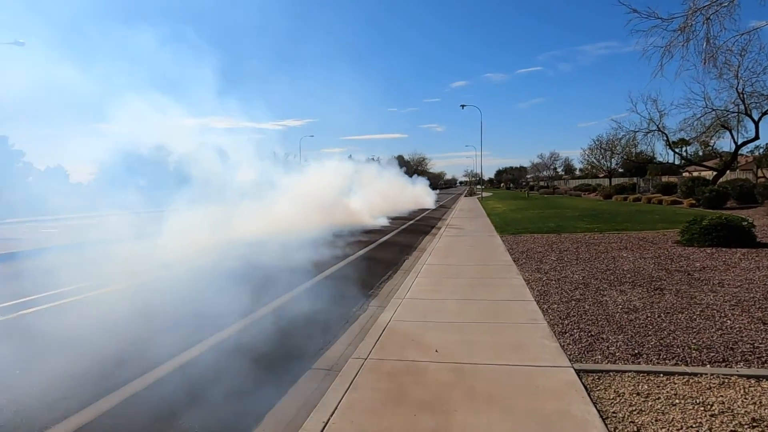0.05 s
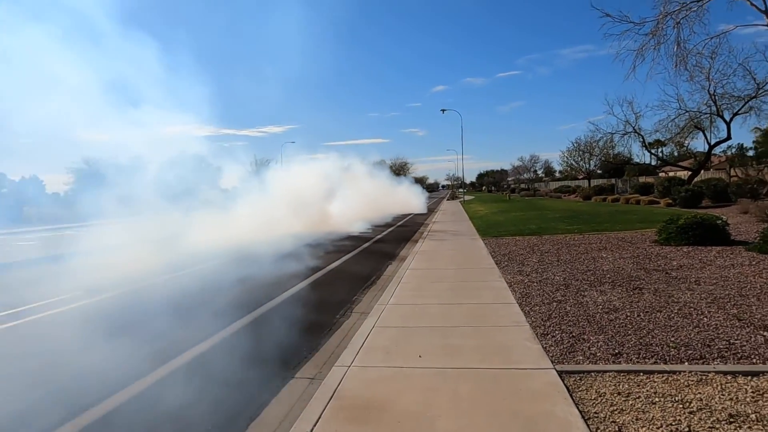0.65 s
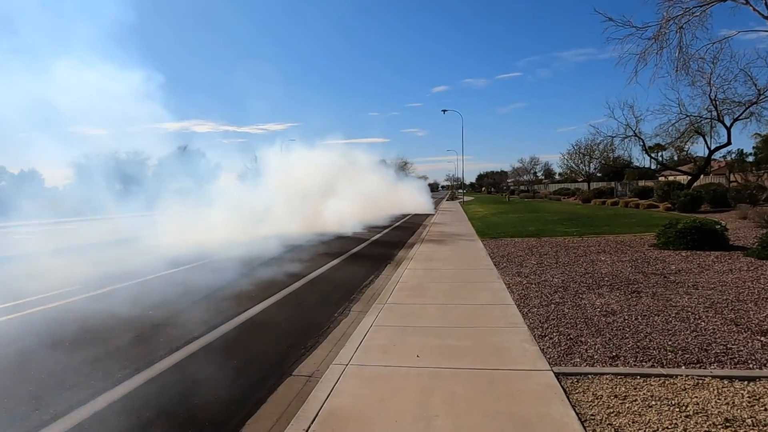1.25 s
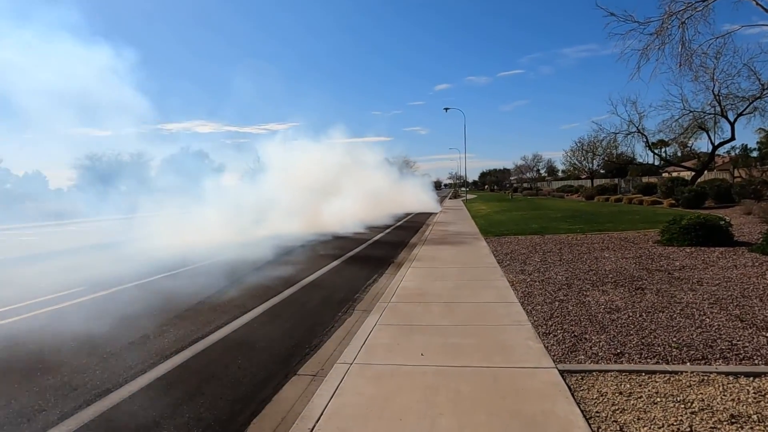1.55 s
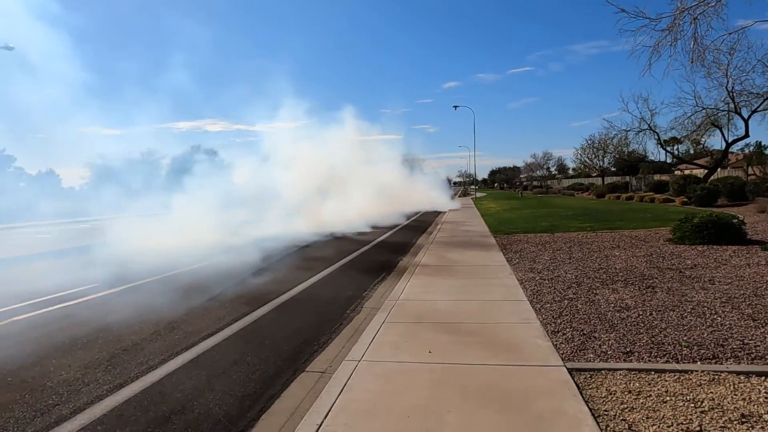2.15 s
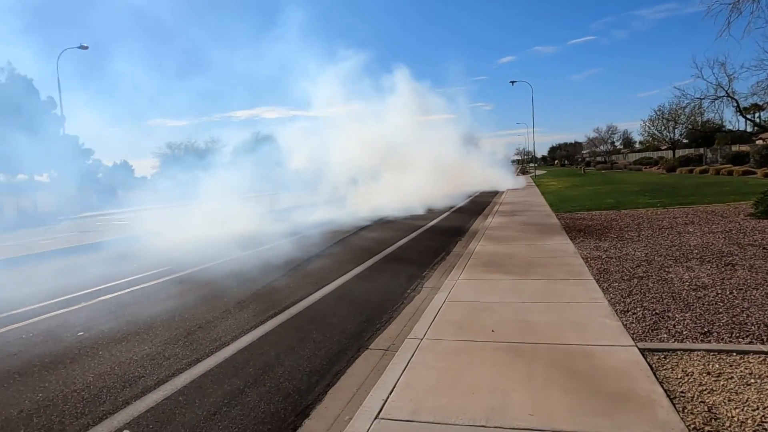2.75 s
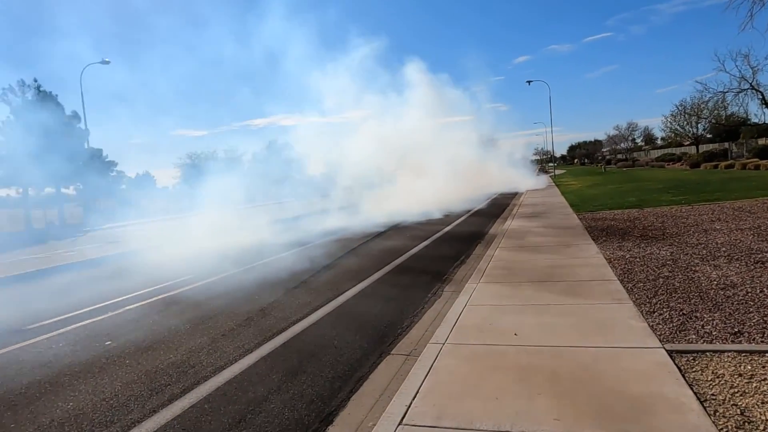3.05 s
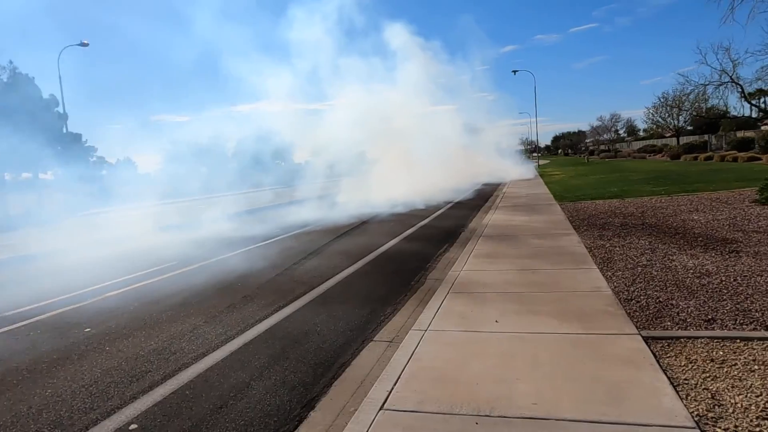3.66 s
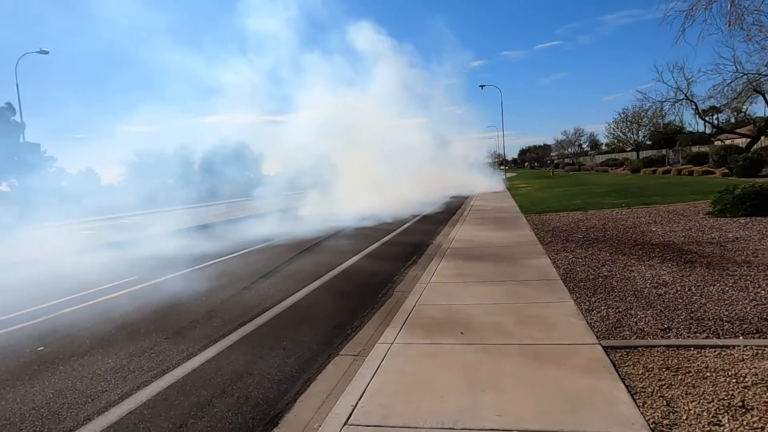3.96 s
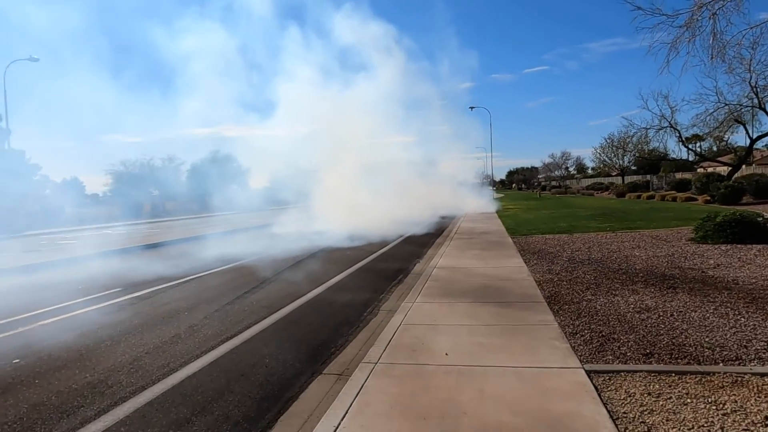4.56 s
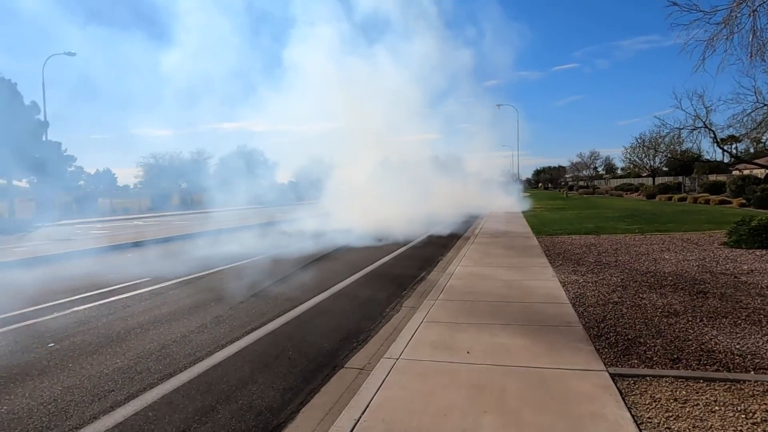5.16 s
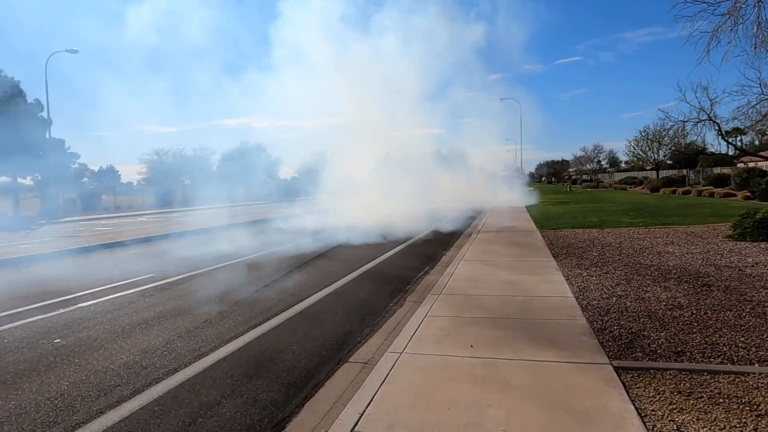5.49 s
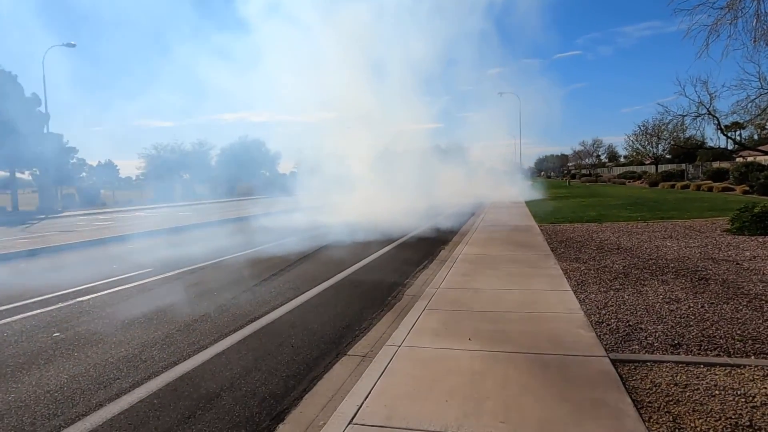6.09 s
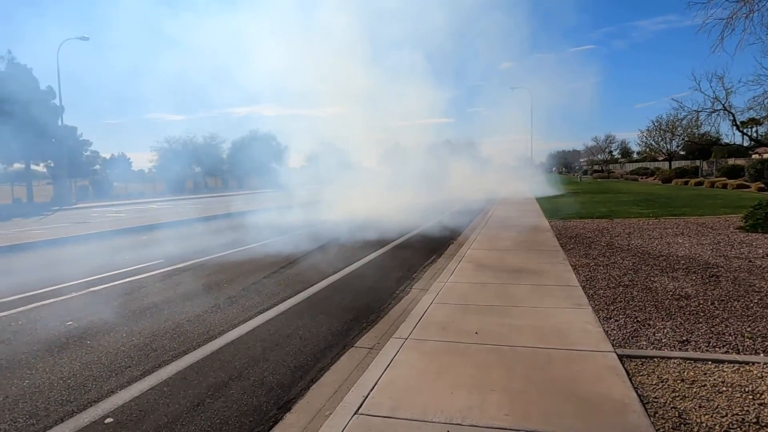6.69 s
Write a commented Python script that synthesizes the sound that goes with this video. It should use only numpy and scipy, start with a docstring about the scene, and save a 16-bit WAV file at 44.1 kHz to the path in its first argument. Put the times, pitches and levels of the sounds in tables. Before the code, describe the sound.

A V8 car revs hard through a burnout, tyres squealing briefly, then backs off with exhaust pops and crackles and drones away.

```python
"""A V8 car does a burnout on an open road, heard through one microphone at the roadside.
Close by, it revs up, eight blows a cycle ringing the tailpipe, and the slipping tyres chirp.
It stumbles and bangs at about 1 s, then pulls hard, the gas rasping out in puffs.
Near 4 s the throttle closes and unburnt fuel pops and crackles in the exhaust, echoing faintly off
walls and trees. Last, farther off, the car drones away at steady speed over a low outdoor rumble."""
import sys
import numpy as np
from scipy import signal
from scipy.fft import rfft, irfft, next_fast_len
from scipy.io import wavfile
from scipy.ndimage import uniform_filter1d, minimum_filter1d, map_coordinates

SR = 44100
rng = np.random.default_rng(int(sys.argv[2]) if len(sys.argv) > 2 else 0)


def persist_wave(psi):
    """Save psi, clipped to +-1, as 16-bit WAV."""
    counts = np.round(np.clip(psi, -1, 1) * 32767).astype(np.int16)
    wavfile.write(sys.argv[1], SR, np.atleast_2d(counts).T)


N = 305613
TIME = np.arange(N) / SR
FIRINGS, MID_SPEED = 8, 260  # firings per cycle; mid revs in firings per second

# Each row: time in seconds, engine speed in firings per second.
SPEED = [(0, 231), (.17, 268), (.75, 369.2), (.86, 387), (.92, 374), (1.05, 321), (1.2, 246), (1.3, 224.5),
         (1.6, 236.2), (1.72, 238), (2.02, 253.4), (2.4, 264.6), (2.5, 271), (2.72, 276.8), (2.85, 284.3),
         (3.34, 301.6), (3.52, 291.7), (3.72, 299), (3.88, 294.5), (4.1, 268), (5, 238), (5.16, 229.8),
         (6, 225.6), (6.92, 219.6)]
def crank(flutter=0.0016):
    """Engine cycles completed; the speed is never quite steady."""
    return np.cumsum(curves(SPEED)[0] * (1 + flutter * wobble(30))) / SR / FIRINGS

# In firing order: each cylinder's strength at the tailpipe, and its delay in firing intervals.
BLOW_STRENGTH = [0.76, 0.95, 0.5, .78, 0.6, 0.98, 0.48, 0.31]
BLOW_DELAY = [0, .17, -.02, .06, -.06, .19, .11, 0]
def order_wave(order, cycles, spread=.2, skew=0.4):
    """One harmonic of the cycle rate, phased by the eight blows; the muffler delays high ones more."""
    arrival = (np.arange(FIRINGS) + BLOW_DELAY) / FIRINGS
    phase = np.angle(np.dot(BLOW_STRENGTH, np.exp(-2j * np.pi * order * arrival)))
    lag = skew + spread * np.pi * (order / FIRINGS) ** 2
    return np.sqrt(2) * np.cos(2 * np.pi * order * cycles + phase - lag)

# The main harmonics, as multiples of the cycle rate.
STRONG_ORDERS = (4, 6, 8, 16)
# Each row: multiple of the cycle rate, then relative dB when revving, lugging, pulling and coasting.
WEAK_ORDERS = [(2, 7, 3.5, 1.5, 4), (3, 2.5, 1, -2.5, 11.5), (5, -2.5, -12.5, -19, 2.5),
               (7, -14, -18, -19.5, 8), (9, -4.5, -6.5, -0.5, 6), (10, 2.5, -1.0, 1.5, 11.5),
               (11, -2.0, -1, -3, 10), (12, 3.5, 3, 4, 10), (13, -1.5, -4, -4, -1.5), (14, 3, 3, 1.5, 11),
               (15, -1.5, -9, -24.5, 1), (17, 6, 2, -4.0, -10.5), (18, 2, 7, 7, 2), (19, 4, 3.5, 2, 0.5),
               (20, 5.5, 7, 6, 2.5), (21, -5.5, 3, 5.5, -7.5), (22, 1.5, -4.5, -4, -3),
               (23, -0.5, 1, 0, -6), (24, 5.5, -2, 5, -3), (25, -3, 0, 0, -5.5), (26, 0.5, 7.5, 5, -11),
               (27, 8.5, 4.0, 8.5, -11), (28, 4, 5, 9.5, -11), (29, 2.5, 2.5, 1, -17.5),
               (30, -6, -0.5, -1, -18), (31, 2, 9, 5.5, -13.5), (32, 7, 6, 7.5, -12),
               (33, 0.5, 6, 2, -11.5), (34, 5.5, 3, 2, -7.5), (35, 12.5, 11.5, 16.5, -8.5),
               (36, 10.5, -9.5, 4.5, -12)]
# Timing scatter at mid revs, in cycles, one value per stage; largest with the throttle shut.
SCATTER = (.003, .0035, .0017, .004, .025, .015, .0015, .0015)
# The tailpipe's tone. Each row, as in every tone below: frequency in Hz, relative level in dB.
PIPE_TONE = [(20, -14), (75, -8.5), (140, -2.5), (230, -1), (330, -2), (450, 2), (570, -0.9), (690, -13.5),
             (800, -9.5), (910, -14), (1100, -24), (1260, -36.5), (1450, -42.5), (2000, -41.5),
             (4000, -63.5)]
def exhaust_note(cycles, waver_db=0.6, lug_fade_s=(2.3, 3.0), size=2048):
    """The repeating part of the exhaust pulses, shaped by the pipe; its harmonics follow the load."""
    orders, *load_db = np.transpose(WEAK_ORDERS)
    waves = np.array([order_wave(round(k), np.arange(size) / size) for k in orders])
    revving = by_stage(np.isin(STAGES, "revving"))
    loaded = by_stage(np.isin(STAGES, ("stumbling", "pulling")))
    climbed = np.interp(TIME, lug_fade_s, (0, 1))  # out of low-speed lugging
    shares = revving, loaded * (1 - climbed), loaded * climbed, 1 - revving - loaded
    # blows come early or late, more so at high revs, blurring the high orders into a roar
    scatter = by_stage(SCATTER) * (curves(SPEED)[0] / MID_SPEED) ** 2 * wobble(130)
    place = ((cycles + scatter) * size).astype(int) % size
    weak = sum(share * (amp(db) @ waves)[place] for share, db in zip(shares, load_db))
    weak = patchy(weak, depth_db=0.8, size=2048, band_count=5, frame_count=12)
    weak *= amp(level("weak orders") + waver_db * wobble(25))
    strong = sum(amp(level("order " + str(k))) * order_wave(k, cycles + scatter / 2)
                 for k in STRONG_ORDERS)
    return shaped(weak + strong, PIPE_TONE)

# The run down the road: revving, stumbling, pulling, coasting, burbling, crackling, settling, cruising.
STAGES = ("revving", "stumbling", "pulling", "coasting", "burbling", "crackling", "settling", "cruising")
# Each row: start and end in seconds of the glide into the next stage.
GLIDES = [(.98, 1.15), (1.27, 1.41), (3.42, 3.825), (3.93, 3.97), (4.16, 4.3), (4.88, 5.43), (5.4, 7.4)]
def by_stage(values):
    """One value per stage, joined by glides."""
    return np.interp(TIME, np.ravel(GLIDES), np.repeat(np.asarray(values, float), 2)[1:-1])

# Each named part: base level in dB for each stage, then dB per octave of engine speed.
PART_LEVELS = {"weak orders": (-29.5, -34, -30.5, -49, -50, -45, -44.5, -41, 4),
               "order 4": (-23.5, -27, -25, -66, -24.5, -36.5, -45, -33, 1),
               "order 6": (-28.5, -27, -30.5, -25, -24.5, -29, -41, -31, 12.5),
               "order 8": (-13, -16, -16, -36.5, -43, -25.5, -27.5, -19, -7),
               "order 16": (-20, -26.5, -21.5, -34, -48.5, -32, -53.5, -34, -12.5),
               "rough edge": (-32.5, -27.5, -40, -36, -32.5, -31.5, -42, -51.5, 8.5),
               "thumps": (-38, -26.5, -41.5, -50.5, -37, -34.5, -60, -55.5, -22),
               "gas rasp": (-37.5, -32, -33.5, -54.5, -75.5, -86.5, -100, -100, 6),
               "tyre hiss": (-55, -43, -47.5, -77.5, -74, -83, -100, -100, 0),
               "road noise": (-50.5, -71, -64, -50.5, -50, -49, -53, -45.5, 1.5),
               "chuff": (-68.5, -64, -71, -40, -40, -38.5, -45.5, -50.5, 4)}
# Each row: time in seconds, engine effort in dB.
EFFORT = [(0, 7.5), (.14, 3.5), (.32, -1), (.58, 0), (.87, -0.5), (.95, -4), (1.06, -1), (1.5, -1.5),
          (2.45, 1), (3.38, 1.5), (3.6, 0), (3.95, -2), (4.15, 0.5), (4.9, -1.5), (5.08, -4), (5.3, -0.5),
          (5.85, 1.5), (6.22, 0.5), (6.45, 1.5), (6.92, -1)]
def level(part):
    """A part's level in dB: set by the stage, moved by effort and engine speed."""
    *stage_db, db_per_octave = PART_LEVELS[part]
    octaves = np.log2(curves(SPEED)[0] / MID_SPEED)
    return by_stage(stage_db) + curves(EFFORT)[0] + db_per_octave * octaves

# Tones of the uneven burn at the tailpipe.
ROUGH_TONE = [(30, -50.5), (90, -32), (170, -4), (225, 4.5), (320, -5), (450, -8.5), (560, -4),
              (700, -13.5), (950, -15), (1300, -37.5), (2000, -51), (6000, -120)]
THUMP_TONE = [(25, -18.5), (55, 8.5), (78, 17), (110, 11.5), (150, 19.5), (220, 2.5), (500, -64.5),
              (3000, -120)]
def uneven_firing(cycles):
    """Each charge burns a little differently: a rough edge on the note and low thumps."""
    number = (cycles * FIRINGS).astype(int)
    at = np.flatnonzero(np.diff(number)) + 1
    strength = np.take(BLOW_STRENGTH, number[at] % FIRINGS)
    out = np.zeros(N)
    for part, tone in ("rough edge", ROUGH_TONE), ("thumps", THUMP_TONE):
        blows = np.zeros(N)
        blows[at] = strength * rng.standard_normal(len(at))
        out += amp(level(part)) * unit(coloured(blows, tone))
    return out

# Each row: start and end in seconds, firings from blow to blow, thump and bark in dB, drift in dB.
STUMBLES = [(.76, .92, 8, -13.5, -19, 0), (1.044, 1.118, 4, -10.5, -12, 0), (1.122, 1.174, 2, -11, -15, 0),
            (1.188, 1.236, 2, -18, -17, -2), (1.249, 1.302, 3, -15, -16, 3), (3.441, 3.48, 8, -40, -13, 0),
            (3.497, 3.625, 4, -40, -12, -1), (3.646, 3.71, 8, -40, -14, -7)]
# Tones of the deep thump and the pipe's bark.
STUMBLE_TONE = [(25, -19.5), (55, -10.5), (80, 3.5), (140, -4), (220, -14), (520, -28), (1000, -28.5),
                (1600, -53.5), (6000, -110)]
BARK_TONE = [(60, -29), (160, -8), (300, 1.5), (560, -4), (720, -9), (1000, -14.5), (1300, -35.5),
             (2500, -53.5), (6000, -100)]
def stumble(cycles, scatter_db=2.0):
    """Only every few cylinders fire hard, so separate blows thump and bark from the pipe."""
    thumps, barks = np.zeros((2, N))
    for start, end, every, thump_db, bark_db, drift_db in STUMBLES:
        lit = np.arange(cycles[round(start * SR)], cycles[round(end * SR)], round(every) / FIRINGS)
        at = np.searchsorted(cycles, lit)
        db = drift_db * np.linspace(0, 1, len(at)) + scatter_db * rng.standard_normal(len(at))
        thumps[at], barks[at] = amp(thump_db + db), amp(bark_db + db)
    return struck(thumps, STUMBLE_TONE) + struck(barks, BARK_TONE)

# Misfires and afterfire. Each row: start in seconds, then bang, boom and crack in dB before their trims.
POPS = [(1.045, -20, -10, -44), (1.070, -20, -19, -47), (1.095, -11.5, -15, -47), (1.128, -16, -10.5, -44),
        (1.158, -17, -13.5, -41), (1.189, -19, -21, -52), (1.210, -18, -14.5, -49), (1.261, -15, -10, -42),
        (1.297, -20.5, -15, -49), (1.314, -16, -20.5, -48), (3.958, -24, -34, -59),
        (4.007, -38, -22.5, -66.5), (4.094, -31, -25.5, -63.5), (4.11, -38, -19.5, -64.5),
        (4.139, -28, -14.5, -61), (4.212, -19, -14, -50), (4.229, -18, -12.5, -52),
        (4.2407, -11.5, -13.5, -35.5), (4.246, -23, -18, -45.5), (4.276, -24, -15.5, -51),
        (4.328, -29, -20, -55.5), (4.363, -26, -18.5, -61), (4.374, -26.5, -15, -58),
        (4.389, -17.5, -10.5, -42.5), (4.393, -33, -14.5, -54), (4.417, -26, -13, -56),
        (4.436, -22, -21, -48), (4.447, -24, -19.5, -57), (4.460, -23, -11, -42.5),
        (4.4957, -18.5, -16.5, -41.5), (4.503, -30.5, -12, -57), (4.511, -35.5, -10.5, -61.5),
        (4.561, -28, -22.5, -69), (4.659, -24, -13, -58), (4.708, -28, -14, -56),
        (4.722, -21, -12.5, -45.5), (4.756, -29, -14, -60), (4.763, -25, -20, -55),
        (4.779, -25, -10.5, -52), (4.784, -19.5, -17, -45.5), (4.822, -23, -13, -38),
        (4.828, -22, -11.5, -38.5), (4.838, -31, -11.5, -51), (4.881, -25.5, -14, -49),
        (4.925, -19.5, -11, -46.5), (4.929, -27.5, -18.5, -49.5), (4.981, -30, -19.5, -54),
        (4.997, -31, -20.5, -60), (5.244, -28, -26, -67), (5.337, -25, -23.5, -63),
        (5.821, -24.5, -23.5, -64), (6.773, -23, -31, -62)]
# Tones of a pop's low, middle and high parts.
BOOM_TONE = [(40, -40.5), (90, -3.5), (160, 4), (235, 18), (320, 7), (430, 11), (560, 10), (700, -11),
             (1200, -50), (5000, -120)]
BANG_TONE = [(100, -43.5), (400, -16), (700, 4.5), (1000, 12.5), (1250, -5.5), (1550, -19.5), (2200, -25.5),
             (4000, -62.5), (9000, -120)]
CRACK_TONE = [(200, -40.5), (900, -17), (1600, 8), (2100, 7), (2500, 0.5), (3300, 7.5), (4200, -9),
              (6000, -24), (9000, -44), (14000, -65)]
def afterfire(rise_s=0.0006, blow_s=0.012, heat_shift=0.046):
    """Each pop is a shock and a short turbulent burn: a boom in the pipe, a bang and crack at its end."""
    t = np.arange(SR // 5) / SR
    out = np.zeros(N + SR)
    for start, bang_db, boom_db, crack_db in POPS:
        shift = np.exp(heat_shift * rng.standard_normal())  # gas heat moves the resonances
        for tone, db, turbulence, t60_s in ((BOOM_TONE, boom_db - 4, 0.062, .026),
                                            (BANG_TONE, bang_db - 12.5, 0.14, .026),
                                            (CRACK_TONE, crack_db - 7, 0.6, .013)):
            envelope = (1 - np.exp(-t / rise_s)) * amp(-60 * t / t60_s)
            burst = turbulence * envelope * rng.standard_normal(len(t))
            burst[0] += 1  # the shock
            pop = coloured(burst, np.multiply(tone, (shift, 1)))
            blow_rms = np.sqrt(np.sum(pop ** 2) / (blow_s * SR))
            out[round(start * SR):][:len(t)] += amp(db) * pop / blow_rms
    return out[:N]

# Each row: start in seconds, peak level in dB. Their thin tone follows.
TICKS = [(4.817, -51), (4.881, -58), (4.893, -45)]
TICK_TONE = [(1500, -36.5), (4000, -2), (5800, 3.5), (8000, -10), (12500, -13), (14000, -32)]
def ticks():
    """A few thin snaps among the pops, and much brighter."""
    snaps = np.zeros(N)
    for start, db in TICKS:
        snaps[round(start * SR)] = amp(db)
    return struck(snaps, TICK_TONE)

def gas_puffs(cycles, puff_db=-3, unevenness=0.31, grit_db=1.0):
    """The strength of the flow from the pipe: one puff per firing."""
    firing = cycles * FIRINGS
    strength = np.take(BLOW_STRENGTH, firing.astype(int) % FIRINGS) ** unevenness
    return strength * amp(puff_db * np.sin(2 * np.pi * firing) + grit_db * wobble(200))

# The rasp as the car leaves the microphone. Each row: time in seconds, trim in dB.
RASP_TRIM = [(0, 0.5), (.6, 2), (1.75, -0.5), (2.4, -7), (2.9, -3), (3.4, -8)]
# Its tone at first, and the more resonant one of the long pull.
RASP_TONE = [(400, -23.5), (800, 5), (1200, 6), (1650, 1), (2200, -4), (2700, -5.5), (3600, -7),
             (4500, -17.5), (6000, -26.5), (9000, -47.5), (14000, -100)]
PULL_TONE = [(200, -50.5), (500, -23), (800, 15), (1150, 10.5), (1500, 1.5), (1800, 0), (2150, 3.5),
             (2650, -2.5), (3100, -5), (3650, -5.5), (4500, -16), (6000, -28), (9000, -53), (14000, -100)]
def gas_rasp(cycles, puffs, buzz_db=-4, pull_fade_s=(1.3, 2.7), size=1024):
    """Gas rasps out of the pipe; part of the noise repeats every cycle and so carries the pitch."""
    buzz = np.interp(cycles % 1 * size, np.arange(size), rng.standard_normal(size))
    flow = puffs * (rng.standard_normal(N) + amp(buzz_db) * buzz)
    pull = np.interp(TIME, pull_fade_s, (0, 1))
    gas = (1 - pull) * unit(coloured(flow, RASP_TONE)) + pull * unit(coloured(flow, PULL_TONE))
    gas = patchy(gas, depth_db=1.93, size=512, band_count=4, frame_count=24)
    return amp(level("gas rasp") + curves(RASP_TRIM)[0]) * gas

def chuff(cycles, cycle_phase=.8, uneven_db=3.5):
    """Off the throttle, one cylinder chuffs sharply once a cycle."""
    at = np.flatnonzero(np.diff(np.floor(cycles - cycle_phase)))
    blows = np.zeros(N)
    blows[at] = amp(uneven_db * rng.standard_normal(len(at)))
    return amp(level("chuff")) * unit(coloured(blows, BARK_TONE))

# Each row: time in seconds, pitch in Hz, level in dB, octave in dB relative to the fundamental.
SQUEAL = [(.45, 1295, -43, -20.5), (.6, 1304, -40, -16.5), (.7, 1337, -36, -11.5),
          (.81, 1340, -29.5, -12.5), (.87, 1356, -30.5, -15), (.905, 1340, -26, -9),
          (.98, 1354, -35.5, -23), (1.06, 1347, -75, -24.5)]
def tyre_squeal(jitter=.011, flutter_db=3):
    """The tread sticks and slips at an unsteady pitch and strength as the revs peak."""
    hz, db, octave_db = curves(SQUEAL)
    phase = 2 * np.pi * np.cumsum(hz * (1 + jitter * wobble(220))) / SR
    fundamental = amp(flutter_db * wobble(160)) * np.sin(phase)
    octave = amp(flutter_db * wobble(160) + octave_db) * np.sin(2 * phase)
    return amp(db) * unit(fundamental + octave)

# Tone of the tyres close to the microphone.
HISS_TONE = [(2500, -24), (4500, 3), (5500, -3), (7000, -5.5), (8300, -10.5), (10000, -26.5), (13000, -60)]
def tyre_hiss(puffs, fade_db_per_s=10):
    """The tyres hiss, pulsing with the engine and fading with distance."""
    hiss = unit(coloured(np.sqrt(puffs) * rng.standard_normal(N), HISS_TONE))
    return amp(level("tyre hiss") - fade_db_per_s * TIME) * hiss

# Tone of the car rolling, heard from the roadside.
ROAD_TONE = [(300, -18), (600, 8), (800, -3), (1050, 1), (1400, -7.5), (2000, -13), (3500, -23),
             (5500, -32.5), (8000, -44), (12000, -65), (16000, -110)]
def road_noise():
    """A dull rush from the road."""
    return amp(level("road noise")) * unit(coloured(rng.standard_normal(N), ROAD_TONE))

# Each row: frequency in Hz, seconds for the echo to fall 60 dB.
ECHO_DECAY = [(100, 1), (600, 0.23), (3000, 0.23), (9000, 0.058)]
def roadside_echo(x, delay_s=.008):
    """Walls and trees scatter sound back to the microphone; the treble dies first."""
    hz, t, noise = signal.stft(rng.standard_normal(SR // 2), SR, nperseg=256)
    decay = amp(-60 * t / along(ECHO_DECAY, hz)[:, None])
    tail = signal.istft(noise * decay, SR, nperseg=256)[1]
    delayed = np.pad(x, (round(delay_s * SR), 0))
    return signal.fftconvolve(delayed, tail / np.linalg.norm(tail))[:N]

# Tone of the open air around the microphone.
RUMBLE_TONE = [(15, -9), (30, -6), (45, -7.5), (60, -4), (78, 5), (100, -5), (160, -12), (400, -30),
               (4000, -120)]
def rumble(level_db=-36, swell_db=2.0):
    """A low outdoor rumble lies under everything."""
    return amp(level_db + swell_db * wobble(9.6)) * unit(coloured(rng.standard_normal(N), RUMBLE_TONE))

def amp(db):
    """Decibels to gain."""
    return 10 ** (np.asarray(db) / 20)

def unit(x):
    """Scale to rms 1."""
    return x / np.sqrt(np.mean(x ** 2) + 1e-20)

def along(points, hz):
    """(Hz, value) points read on a log axis."""
    f, v = np.transpose(points)
    return np.interp(np.log(hz + 1), np.log(f + 1), v)

def curves(rows):
    """One value per sample for each column after the time."""
    seconds, *columns = np.transpose(rows)
    return [np.interp(TIME, seconds, column) for column in columns]

def wobble(rate):
    """A smooth random curve, rate knots a second."""
    knots = rng.standard_normal(int(N * rate / SR) + 4)
    return map_coordinates(knots, [TIME * rate])

def ring(tone, size=8192):
    """The causal impulse response that has this tone."""
    cepstrum = irfft(np.log(amp(along(tone, np.fft.rfftfreq(size, 1 / SR)))))
    cepstrum[1:size // 2] *= 2
    cepstrum[size // 2 + 1:] = 0
    return irfft(np.exp(rfft(cepstrum)))

def coloured(x, tone):
    """x sent through a body with this tone."""
    return signal.fftconvolve(x, ring(tone))[:len(x)]

def struck(blows, tone):
    """Blows through a body, each keeping its peak height."""
    return coloured(blows, tone) / np.abs(ring(tone)).max()

def shaped(x, tone):
    """x weighted by this tone, with no band delayed."""
    size = next_fast_len(N + SR // 2)
    return irfft(rfft(x, size) * amp(along(tone, np.fft.rfftfreq(size, 1 / SR))), size)[:N]

def patchy(x, depth_db, size, band_count, frame_count):
    """Each band of x swells and fades on its own, as through moving air."""
    bands = signal.stft(x, nperseg=size)[2]
    swell = uniform_filter1d(rng.standard_normal(bands.shape), band_count, 0)
    swell = uniform_filter1d(swell, frame_count, 1)
    return signal.istft(bands * amp(depth_db * unit(swell)), nperseg=size)[1][:N]

def scene(echo_db=-13):
    """Engine, pops and tyres as they reach the roadside, in mono; only the pops and ticks echo."""
    cycles = crank()
    pops = afterfire() + ticks()
    engine = exhaust_note(cycles) + uneven_firing(cycles) + stumble(cycles)
    puffs = gas_puffs(cycles)
    noise = gas_rasp(cycles, puffs) + tyre_hiss(puffs) + chuff(cycles) + road_noise() + rumble()
    return (engine + pops + noise + tyre_squeal() + amp(echo_db) * roadside_echo(pops))[None]

def record(dry, ceiling=0.67, top_hz=13800):
    """The camera limits the peaks and cuts the top treble; a 4 ms fade keeps both ends from clicking."""
    hold = SR // 100  # 10 ms
    needed = np.minimum(1, ceiling / (np.abs(dry) + 1e-9))
    gain = uniform_filter1d(minimum_filter1d(needed, 2 * hold), hold)
    fade = np.minimum(1, np.arange(N) / (SR // 250))
    limited = dry * gain * fade * fade[::-1]
    size = next_fast_len(N + SR // 2)
    passband = np.fft.rfftfreq(size, 1 / SR) < top_hz
    return irfft(rfft(limited, size) * passband, size)[..., :N]

dry = scene()
out = record(dry)
persist_wave(out)
```